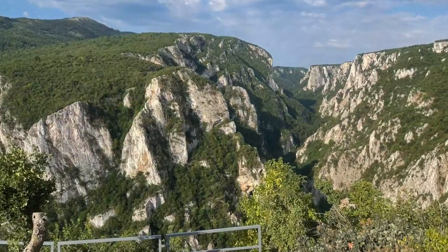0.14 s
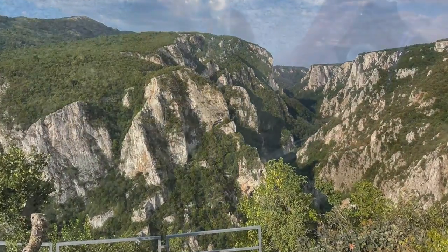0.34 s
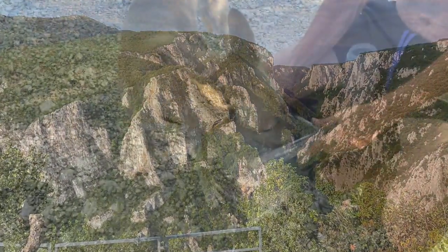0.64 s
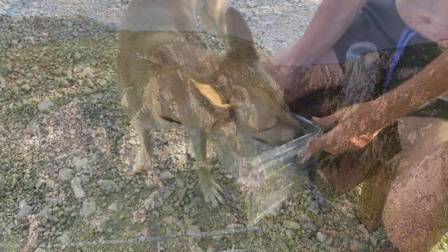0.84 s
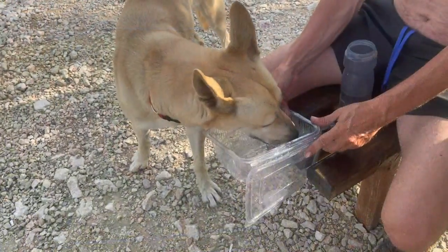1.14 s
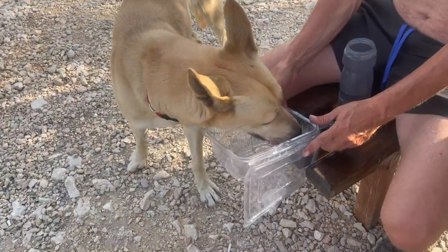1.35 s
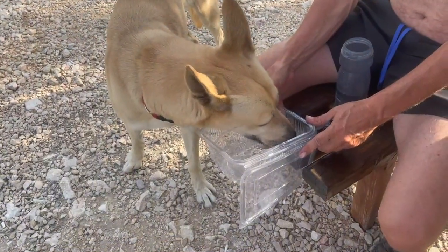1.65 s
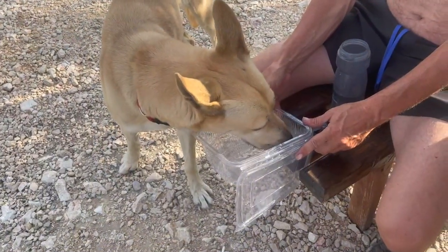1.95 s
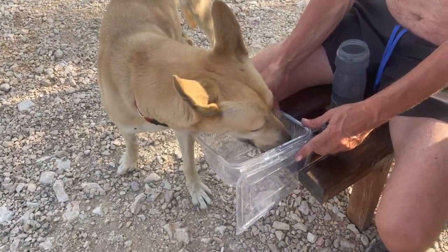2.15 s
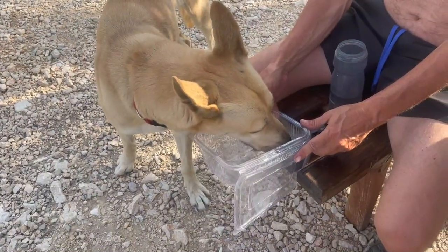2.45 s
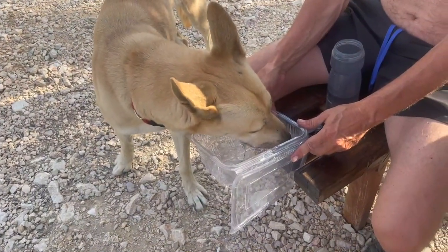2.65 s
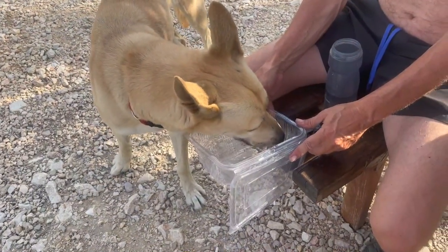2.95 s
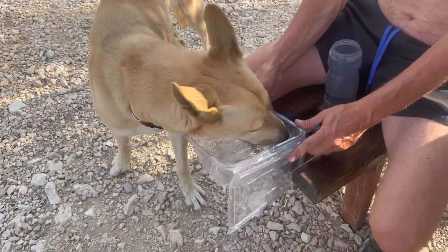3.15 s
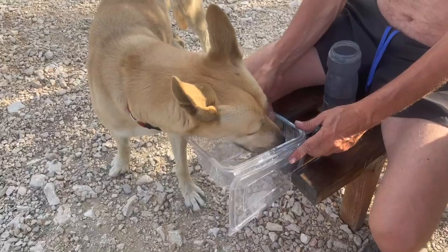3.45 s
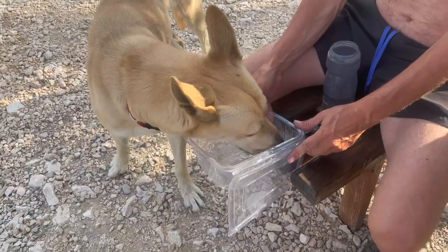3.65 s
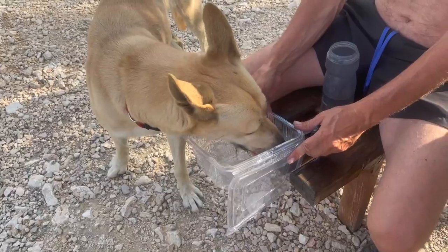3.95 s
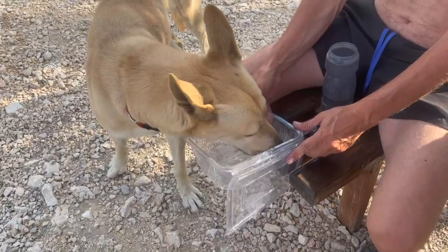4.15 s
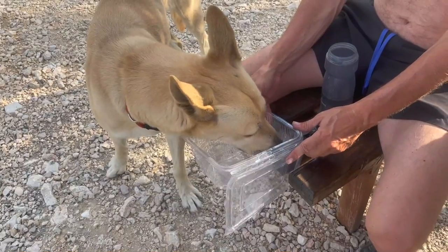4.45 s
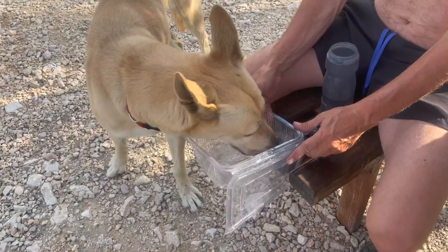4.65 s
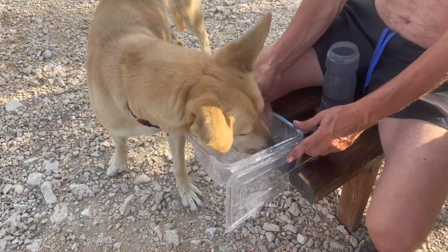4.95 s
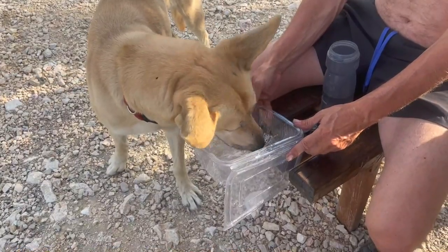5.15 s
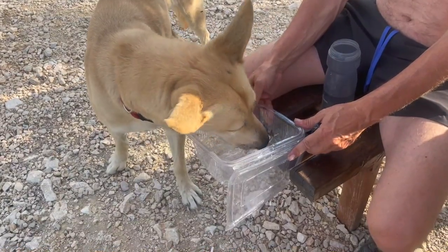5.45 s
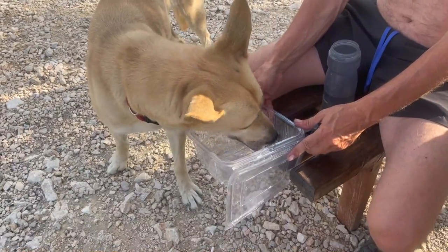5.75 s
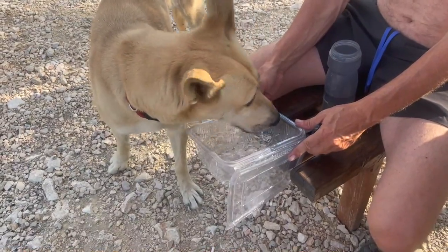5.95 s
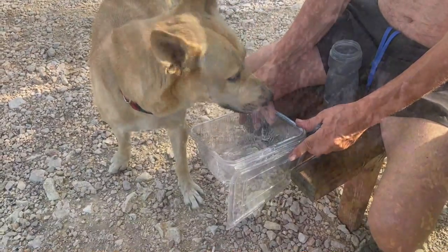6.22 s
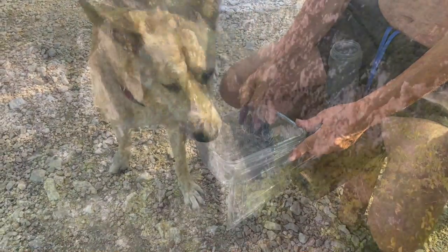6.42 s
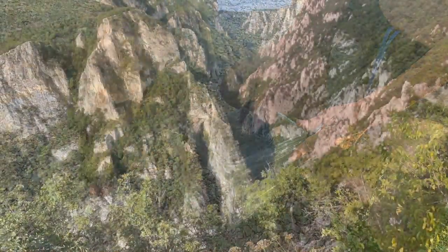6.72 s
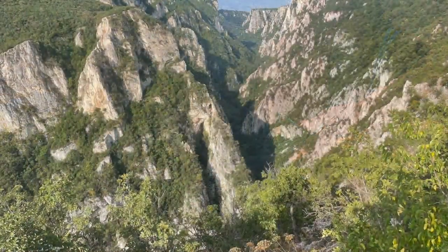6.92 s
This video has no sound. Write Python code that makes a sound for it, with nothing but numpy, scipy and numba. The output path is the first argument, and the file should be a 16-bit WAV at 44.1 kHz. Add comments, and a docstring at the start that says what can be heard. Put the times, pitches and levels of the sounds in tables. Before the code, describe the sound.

From silence, faint wet laps emerge and soon become a rapid, irregular drinking rhythm, about eight strokes a second, slowing slightly later. Rising bubble plops, sharp droplet ticks and short sprays resonate in thin plastic walls. Breeze rumbles and thumps against a close phone microphone, unevenly left and right, over a faint open-air hush. Everything dwindles to a short fade.

```python
"""A dog laps water from a thin plastic tub outdoors, heard through the two microphone ports of a phone.
Out of silence a short fade opens on faint laps; breeze thumps soon join, as low swings with rough edges.
Each lap is ringing bubbles that plop, noise bursts and ticks of snapping films, slosh and fizzing spray.
The laps peak about 2.6 s in amid strong breeze rumble, and resonators ring the tub walls throughout.
Laps and breeze then thin out over a hush of filtered noise, and a short fade closes at about 7 s."""
import sys
import numpy as np
from scipy import signal
from scipy.fft import rfft, irfft, next_fast_len
from scipy.io import wavfile
from scipy.ndimage import uniform_filter1d
from numba import njit

SR = 44100
rng = np.random.default_rng(int(sys.argv[2]) if len(sys.argv) > 2 else 0)


def log_audio(samples):
    """Write samples as a 16-bit WAV file to the path given in sys.argv[1]."""
    # one column per channel
    frames = np.atleast_2d(samples).T
    # limit to full scale, then quantise
    limited = np.clip(frames, -1, 1)
    pcm = np.round(limited * 32767).astype(np.int16)
    wavfile.write(sys.argv[1], SR, pcm)


N = 312228
T = np.arange(N) / SR

# tongue strokes through the water:
# (start [s], time from start to fall [s], slosh level [dB], spray level [dB])
TONGUE_STROKES = [(0.259, 0.014, -79.5, -100), (0.347, 0.076, -80.5, -86.5), (0.495, 0.054, -68.5, -67.5),
                  (0.614, 0.048, -66.5, -69.5), (0.718, 0.054, -62.5, -66.5), (0.831, 0.071, -61.5, -59.5),
                  (0.934, 0.12, -67.5, -75), (1.13, 0.065, -70, -76.5), (1.228, 0.017, -60, -62),
                  (1.335, 0.055, -58.5, -52.5), (1.445, 0.074, -59, -69), (1.63, 0.13, -56, -57),
                  (1.784, 0.039, -71.5, -68), (1.843, 0.069, -62, -75), (2.086, 0.24, -64.5, -72),
                  (2.207, 0.062, -59.5, -56), (2.332, 0.053, -58.5, -68), (2.493, 0.077, -58, -63),
                  (2.535, 0.091, -51.5, -57), (2.691, 0.031, -55, -58.5), (2.925, 0.077, -64, -67.5),
                  (3.096, 0.058, -61.5, -58.5), (3.217, 0.063, -54.5, -74), (3.389, 0.16, -60.5, -61),
                  (3.585, 0.028, -54, -59), (3.812, 0.097, -64.5, -68.5), (3.934, 0.093, -59.5, -58),
                  (4.078, 0.042, -52.5, -69), (4.246, 0.054, -60, -68), (4.313, 0.079, -61.5, -59),
                  (4.448, 0.061, -62, -62.5), (4.685, 0.047, -64.5, -74), (4.784, 0.06, -59.5, -75),
                  (4.852, 0.054, -55, -58), (4.925, 0.19, -68.5, -69), (5.152, 0.095, -64.5, -67.5),
                  (5.292, 0.1, -63, -64), (5.434, .05, -63.5, -70), (5.679, 0.09, -67, -74),
                  (5.766, 0.032, -60.5, -65.5), (5.837, 0.088, -68, -66.5), (6.156, 0.0083, -75, -72),
                  (6.359, 0.045, -72, -83), (6.494, 0.026, -78, -100), (6.622, 0.07, -78, -83.5),
                  (6.728, .14, -79.5, -76)]


def undb(db):
    """Decibels to linear gain."""
    return 10 ** (np.asarray(db) / 20)


def unit(x):
    """Scale to an rms of 1."""
    return x / np.sqrt(np.mean(x ** 2))


def curve(table):
    """Join the points of a (time, value) table into a line over the whole scene."""
    s, value = np.transpose(table)
    return np.interp(T, s, value)


def colour(x, points):
    """Shape the spectrum by (Hz, dB) points, falling steeply beyond the ends; rms 1."""
    below = (points[0][0] / 8, points[0][1] - 90)
    above = (points[-1][0] * 8, points[-1][1] - 90)
    hz, db = np.transpose([below, *points, above])
    f = np.fft.rfftfreq(N, 1 / SR) + 1
    gain = undb(np.interp(np.log(f), np.log(hz), db))
    return unit(irfft(rfft(x) * gain, N))


def walk(rate):
    """Random levels held 1 / rate s and smoothed twice over that time; spread near 1."""
    k = int(SR / rate)
    held = np.repeat(rng.standard_normal(N // k + 1), k)
    return 1.3 * uniform_filter1d(uniform_filter1d(held, k), k)[:N]


@njit
def grains(n, start, hz, t60, size, rise, glide):
    """Damped tones that swell in `rise` s and bend in pitch by the fraction `glide` over their ring."""
    out = np.zeros(n)
    for g in range(len(start)):
        first = int(start[g] * SR)
        length, phase = int(t60[g] * SR) + 2, 0.
        for i in range(min(length, n - first)):
            phase += 2 * np.pi * hz[g] * (1 + glide[g] * i / length) / SR
            swell = 1 - np.exp(-(i / (rise * SR)) ** 2)
            decay = np.exp(-6.9078 * i / length)  # 60 dB over the ring
            out[first + i] += size[g] * swell * decay * np.sin(phase)
    return out


def bursts(s, db, hz, t60, width, rise):
    """Decaying puffs of noise in a bell-shaped band, `width` octaves each way from its centre."""
    out = np.zeros(N + SR)
    for at, gain, centre, ring in zip(s, undb(db), hz, t60):
        n = next_fast_len(int(ring * SR) + 256)
        t = np.arange(n) / SR
        octaves = np.log2((np.fft.rfftfreq(n, 1 / SR) + 1) / centre)
        band = np.exp(-(octaves / width) ** 2)
        puff = unit(irfft(rfft(rng.standard_normal(n)) * band, n))
        envelope = (1 - np.exp(-t / rise)) * np.exp(-np.log(1000) * t / ring)
        first = int(at * SR)
        out[first:first + n] += gain * puff * envelope
    return out[:N]


def swarm(per_s, lo_hz, hi_hz, t60, scatter_db, glide):
    """Many small bubbles of random pitch and size; those that ring longer climb further; rms 1."""
    when, pitch, bulk, ring = rng.random((int(per_s * N / SR), 4)).T
    hz = lo_hz * (hi_hz / lo_hz) ** pitch
    size = undb(-scatter_db * np.log(1 - bulk))  # few large, many small
    return unit(grains(N, when * N / SR, hz, t60 * (.5 + ring), size, t60 / 8, glide * ring))


def plops():
    """Trapped air rings as two bubbles that climb in pitch, each amid a short wet smack."""
    # tongue strokes that trap air: (time [s], big bubble relative level [dB], big bubble starting pitch [Hz],
    # small bubble relative level [dB], small bubble starting pitch [Hz])
    trapped_air = [(0.504, -51, 736, -55, 1950), (0.646, -44.5, 1070, -53, 1420),
                   (0.764, -37, 620, -46.5, 2320), (0.878, -34, 724, -54, 2530),
                   (0.9, -38.5, 670, -62, 1500), (0.945, -47, 610, -38.5, 1960),
                   (0.971, -39.5, 620, -58, 2500), (1.015, -44, 730, -68, 1570),
                   (1.176, -53, 694, -53.5, 1520), (1.231, -35.5, 1340, -45, 1530),
                   (1.287, -40, 565, -64, 2400), (1.35, -43, 1300, -40.5, 2360),
                   (1.368, -45, 720, -39.5, 1900), (1.38, -41, 720, -38.5, 2120),
                   (1.398, -37.5, 710, -43, 1560), (1.492, -39.5, 1280, -60, 1470),
                   (1.55, -54, 1300, -50, 2070), (1.651, -57, 1060, -63, 1530),
                   (1.674, -36, 638, -39.5, 1740), (1.71, -29.5, 627, -39.5, 1540),
                   (1.778, -30, 850, -61, 2480), (2.131, -33.5, 630, -57, 1720),
                   (2.217, -52, 720, -43.5, 2080), (2.271, -33, 1260, -44.5, 1620),
                   (2.348, -34.5, 707, -57, 2300), (2.374, -34.5, 1350, -51, 1520),
                   (2.505, -47, 650, -56, 1550), (2.558, -23, 989, -23, 2116),
                   (2.562, -27.5, 647, -40, 1493), (2.586, -25.5, 635, -56.5, 2000),
                   (2.604, -45, 624, -54.5, 2000), (2.617, -53, 675, -39, 2360),
                   (2.64, -37, 1006, -52, 1620), (2.706, -34, 714, -60, 1480),
                   (2.737, -31.5, 1300, -42, 2130), (2.861, -48.5, 1190, -59.5, 1440),
                   (2.939, -40.5, 1060, -71, 1950), (2.978, -42, 1280, -44.5, 1410),
                   (2.999, -33, 542, -47.5, 1740), (3.073, -40, 730, -64, 1670),
                   (3.119, -39, 725, -37, 2050), (3.147, -42, 940, -42, 1590),
                   (3.156, -28.5, 716, -52, 1560), (3.211, -42, 710, -69, 1680),
                   (3.251, -28.5, 1314, -39, 1620), (3.395, -44, 1110, -42, 3230),
                   (3.414, -40, 1280, -41.5, 3030), (3.434, -28.5, 1160, -35, 2010),
                   (3.46, -27, 925, -42, 1940), (3.478, -27, 676, -48, 2370), (3.524, -33, 1120, -65, 1510),
                   (3.602, -59, 664, -45, 2380), (3.619, -31.5, 1216, -45, 1660),
                   (3.741, -41.5, 1120, -80, 1630), (3.807, -48, 1180, -74, 1650),
                   (3.857, -38.5, 1280, -51, 1460), (3.88, -28.5, 725, -42, 1790),
                   (3.944, -29.5, 910, -47, 1470), (3.991, -31.5, 700, -48.5, 2400),
                   (4.022, -26.5, 650, -70, 1480), (4.09, -38.5, 1040, -57, 1430),
                   (4.109, -33, 1240, -43.5, 1490), (4.193, -45, 1050, -74, 2040),
                   (4.214, -41.5, 1302, -48.5, 1610), (4.256, -41, 1250, -43, 1488),
                   (4.269, -25, 1022, -32, 2015), (4.325, -28.5, 723, -44, 1830),
                   (4.398, -34, 706, -76, 1640), (4.45, -41, 730, -59, 1790), (4.508, -33, 1417, -45, 1510),
                   (4.603, -43, 973, -65, 1920), (4.778, -27, 928, -42, 1970),
                   (4.841, -34.5, 650, -44, 1650), (5.08, -37, 1445, -60, 1530),
                   (5.216, -42.5, 1120, -49, 1480), (5.316, -36.5, 615, -60, 1472),
                   (5.453, -43.5, 660, -61, 2070), (5.776, -55, 1190, -39, 1745),
                   (5.848, -51, 1330, -55.5, 1760), (5.92, -45.5, 677, -47, 2150),
                   (6.167, -50.5, 1370, -61.5, 1510), (6.413, -55, 1162, -54.5, 2200),
                   (6.489, -58.5, 874, -63, 1480), (6.743, -49.5, 800, -61.5, 2270),
                   (6.805, -55.5, 1010, -60, 2830), (6.881, -53, 520, -59, 2780)]
    s, big_db, big_hz, small_db, small_hz = np.transpose(trapped_air)
    big_climb, small_climb = rng.random((len(s), 2)).T
    big = grains(N, s, big_hz, 0.014 + 9 / big_hz, undb(big_db + 1.5), 0.002, 0.16 * big_climb)
    small = grains(N, s, small_hz, 30 / small_hz, undb(small_db + 5.0), 0.00045, 0.033 * small_climb)
    big_smack = bursts(s, big_db - 12.5, 0.94 * big_hz, np.full(len(s), .05), width=0.83, rise=0.001)
    small_smack = bursts(s, small_db - 7.0, small_hz, np.full(len(s), .04), width=0.63, rise=0.00068)
    return big + small + big_smack + small_smack


def snaps():
    """A droplet rings for a few cycles as the film tears, then spray dies away."""
    # water films that snap: (time [s], relative level [dB], starting pitch of the droplet [Hz])
    films = [(0.5123, -49, 4030), (0.6205, -51, 4250), (0.728, -49, 3880), (0.752, -50, 5550),
             (0.823, -52, 3070), (0.856, -39, 3820), (0.942, -43.5, 3200), (1.2304, -41, 4240),
             (1.3498, -50, 3460), (1.417, -67, 4860), (1.6357, -37.5, 5000), (1.6486, -31, 5250),
             (1.6743, -39.5, 4950), (1.73, -40, 4060), (1.779, -44.5, 3470), (1.8618, -46, 3600),
             (1.907, -45.5, 3350), (1.956, -49, 3240), (2.082, -49.5, 3740), (2.153, -43.5, 5260),
             (2.222, -40.5, 4470), (2.349, -42, 4970), (2.4956, -39, 4940), (2.5551, -21, 5000),
             (2.595, -38.5, 5400), (2.717, -37, 3400), (2.756, -37.5, 4030), (3.107, -46, 6100),
             (3.2603, -33, 3350), (3.3953, -42.5, 4060), (3.4145, -58, 3170), (3.4785, -36, 5340),
             (3.547, -49, 4930), (3.603, -37, 4400), (3.972, -39, 5500), (4.255, -38.5, 4470),
             (4.2692, -36, 4400), (4.3407, -35, 10600), (4.966, -52, 6040), (5.085, -58, 5100),
             (5.23, -49, 5200), (4.8658, -31.5, 4490), (5.329, -47, 4600), (5.346, -26.5, 4690),
             (5.3723, -37.5, 5950), (5.702, -57.5, 4700), (5.7772, -41, 3300), (5.843, -54, 3160),
             (5.899, -48, 4220), (6.1685, -39.5, 3840), (6.3036, -46.5, 7680), (6.6598, -51.5, 11140),
             (6.8534, -46, 4450)]
    s, db, hz = np.transpose(films)
    ticks = grains(N, s, hz, 45 / hz, undb(db), 0.00077, np.full(len(s), .05))
    tear = bursts(s, db - 7, 1.235 * hz, np.full(len(s), .018), width=1.0, rise=0.00043)
    spray = bursts(s, db - 20.5, hz, np.full(len(s), .09), width=0.8, rise=0.0049)
    return ticks + tear + spray


def stir():
    """Small bubbles slosh over a wet hiss and finer ones fizz in noise; both flicker within the strokes."""
    # spectrum of the fizzing spray: (frequency [Hz], level [dB])
    spray_colour = [(2500, -17), (3500, -1.5), (5200, -7), (7000, 5), (9500, -7.5), (12000, -14.5),
                    (15500, -15)]
    slosh_fall, spray_fall = 246, 331  # dB per s
    slosh_db, spray_db = np.transpose(TONGUE_STROKES)[2:]
    hiss = colour(rng.standard_normal(N), [(550, 4.5), (1200, -10), (2700, -11)])
    slosh = swarm(450, 580, 2400, .02, 2.5, .18) + .7 * hiss
    mist = swarm(1500, 2500, 15500, .012, 2.3, .05) + .8 * rng.standard_normal(N)
    spray = colour(mist, spray_colour)
    slosh_flicker = undb(4.0 * walk(45))
    spray_flicker = undb(5.06 * walk(70))
    slosh = strokes(slosh_db, slosh_fall) * slosh_flicker * slosh
    return slosh + strokes(spray_db, spray_fall) * spray_flicker * spray


def strokes(db, fall_db_per_s):
    """Each stroke stirs the water up, holds, then lets it settle; powers add, and the gain is returned."""
    attack_s = .012
    power = np.zeros(N)
    for (start, hold, *_), gain in zip(TONGUE_STROKES, undb(db)):
        at = int(start * SR)
        t = T[:min(SR // 2, N - at)]
        rise = np.clip(t / attack_s, 0, 1)
        fall = undb(-fall_db_per_s * np.clip(t - hold, 0, None))
        power[at:at + len(t)] += (gain * rise * fall) ** 2
    return np.sqrt(power)


def tub(x):
    """The thin walls ring with whatever strikes the water: one two-pole resonator per mode."""
    # wall modes: (frequency [Hz], relative level [dB], 60 dB decay time [s])
    modes = [(674.4, 2, 0.039), (1015, 0.5, 0.054), (1220, 2.5, 0.014), (2430, -5, 0.011),
             (2930, -45, 0.06)]
    out = 0
    for hz, db, t60 in modes:
        r = np.exp(-np.log(1000) / (t60 * SR))
        poles = [1, -2 * r * np.cos(2 * np.pi * hz / SR), r * r]
        out = out + undb(db) * (1 - r) * signal.lfilter([1, 0, -1], poles, x)
    return out


def breeze():
    """Air buffets the ports: rumble and single thumps, only partly alike left and right."""
    # strength of the breeze: (time [s], relative rumble level before its wander [dB])
    strength = [(0.2, -109), (0.43, -49.5), (0.58, -74), (0.69, -47), (1.1, -54), (1.47, -44),
                (1.92, -49.5), (2.3, -41.5), (2.62, -41.5), (2.68, -57), (2.73, -41.5), (3.0, -40),
                (3.6, -48), (4.3, -41.5), (4.55, -51.5), (5.9, -55.5), (6.55, -53.5), (7.0, -92)]
    # spectrum of the rumble: (frequency [Hz], level [dB])
    rumble_colour = [(25, -28.5), (45, 4.5), (70, 6.5), (130, -1), (220, -6), (400, -20), (600, -33)]
    # single eddies that thump: (time [s], relative swing level [dB],
    # swing starting pitch before detune [Hz], relative rough edge level [dB])
    eddies = [(0.412, -37, 112, -73), (0.687, -48, 75, -44.5), (0.885, -41.5, 92, -50),
              (1.022, -31, 103, -55.5), (1.155, -41, 110, -65), (1.212, -36, 104, -47),
              (1.37, -44, 80.5, -53.5), (1.428, -31.5, 100, -52), (1.469, -33.5, 89, -39),
              (1.59, -33.5, 78, -57), (1.7, -40, 86, -45.5), (1.785, -32.5, 81.6, -44.5),
              (1.992, -32.5, 97, -69), (2.076, -32, 131, -59), (2.105, -37, 91, -48),
              (2.257, -32.5, 112, -35.5), (2.36, -50, 80, -50), (2.497, -34.5, 63.6, -44),
              (2.6, -33.5, 70, -43), (2.709, -35, 62, -45), (2.861, -27, 80, -45), (2.894, -24, 272, -33),
              (3.008, -24, 137, -34.5), (3.094, -39, 61.6, -41), (3.204, -36.5, 72, -49),
              (3.3, -38, 74, -46.5), (3.452, -36, 158, -55), (3.606, -29.5, 111, -43),
              (3.699, -39, 73.6, -56), (3.83, -32, 73, -52.5), (3.963, -30, 106, -51),
              (4.059, -28, 105, -47.5), (4.111, -31, 68, -49), (4.294, -28, 99, -58),
              (4.337, -26.5, 167, -36), (4.425, -40, 70, -60), (4.492, -37.5, 151, -74),
              (4.678, -37.5, 80, -60.5), (4.741, -40, 99, -55.5), (4.99, -38, 110, -58),
              (5.239, -35, 86, -46.5), (5.412, -38.5, 113.5, -50), (5.542, -42, 63.8, -57),
              (5.635, -37, 76, -63), (5.711, -42, 110, -63.5), (5.759, -33, 257, -45),
              (5.909, -42.5, 98.6, -53.5), (5.98, -44.5, 90, -57.5), (6.212, -33, 146, -43),
              (6.234, -33, 109, -49.5), (6.358, -38, 94.5, -45), (6.546, -39, 113, -51)]
    likeness = .52  # of the two ports: 0 unrelated, 1 identical
    s, db, hz, edge_db = np.transpose(eddies)
    level_db = curve(strength) + 3.68 * walk(22)
    pair = []
    # first what the ports share, then what sets them apart, a quarter cycle later
    for share, late_cycles in ((1 + likeness, 0), (1 - likeness, .25)):
        rumble = colour(rng.standard_normal(N), rumble_colour) * undb(level_db + 1.7 * walk(18))
        detune = 1 + 0.07 * rng.standard_normal(len(s))
        # the air in the port swings a few times, slowing down
        swing = grains(N, s + late_cycles / hz, hz * detune, 9 / hz, undb(db + 4.0), 0.0052,
                       np.full(len(s), -.3))
        ring = np.full(len(s), .07)
        edge_noise = bursts(s, edge_db - 1.0, np.full(len(s), 290.), ring, width=0.67, rise=0.0015)
        # the edge tone plunges through zero frequency as it dies
        edge_tone = grains(N, s + late_cycles / 400, 400 * detune, ring, undb(edge_db + 5), 0.0031,
                           np.full(len(s), -1.6))
        pair.append(np.sqrt(share) * (rumble + swing + edge_noise + edge_tone))
    common, difference = pair
    return np.array([common + difference, common - difference])


def open_air():
    """A steady hush of coloured noise whose level swells early, then sinks."""
    # spectrum of the hush: (frequency [Hz], level [dB])
    air_colour = [(500, -6), (1200, 1.5), (3000, -8), (6000, -13), (12000, -17.5)]
    # slow level of the hush: (time [s], gain [linear])
    air_gain = [(.15, 0.017), (1.1, 0.15), (6.1, 0.072), (7.0, 0.029)]
    # -62 dB scales the gain curve
    return undb(-62) * curve(air_gain) * colour(rng.standard_normal(N), air_colour)


def ports(x):
    """The phone body turns phase and balance between its two ports, half on each side."""
    # phase between the ports: (frequency [Hz], left lead [rad])
    port_phase = [(0, .4), (5500, .5), (6600, 2.8), (7400, 3.1), (8800, 2.1), (10400, .6), (12000, -.6),
                  (13800, -2.8), (16100, -2.6)]
    # balance between the ports: (frequency [Hz], left minus right [dB])
    port_balance = [(300, .5), (1200, 2.2), (4500, 1.0), (8000, 0.1)]
    f = np.fft.rfftfreq(N, 1 / SR)
    lead = np.interp(f, *np.transpose(port_phase))
    balance_db = np.interp(f, *np.transpose(port_balance))
    turn = np.exp(.5j * lead) * undb(balance_db / 2)
    return np.array([irfft(rfft(x) * turn, N), irfft(rfft(x) / turn, N)])


def scene():
    """Water, tub and open air reach both ports; the breeze acts on the ports directly."""
    water = plops() + snaps() + stir()
    return ports(water + undb(-4) * tub(water) + open_air()) + breeze()


def record(dry):
    """Short fades from and to silence; a steep low-pass on the phone cuts the top."""
    top_hz, fade_s = 16200, 0.065
    gate = np.clip(np.minimum(T - .17, 7.01 - T) / fade_s, 0, 1)
    low_pass = signal.ellip(10, .2, 80, top_hz, fs=SR, output="sos")
    return signal.sosfilt(low_pass, dry * gate)


dry = scene()
out = record(dry)
log_audio(out)
```